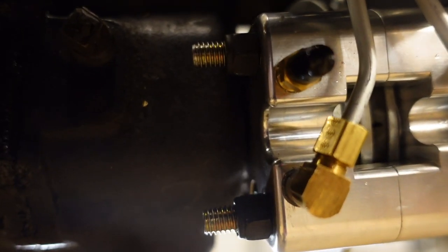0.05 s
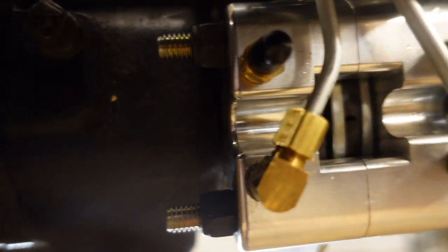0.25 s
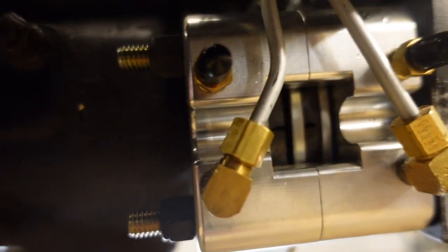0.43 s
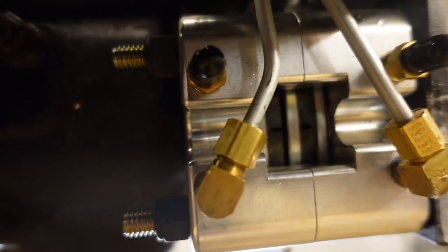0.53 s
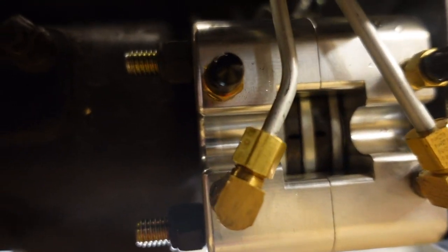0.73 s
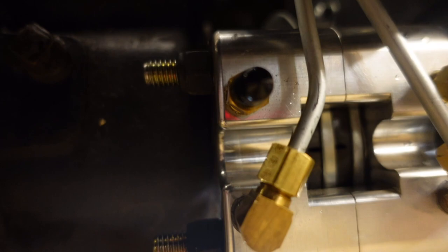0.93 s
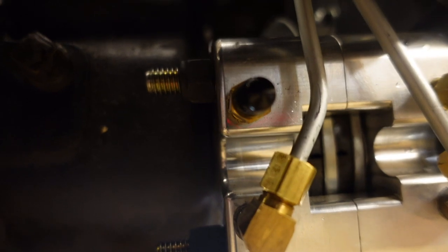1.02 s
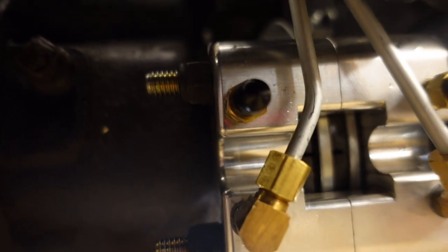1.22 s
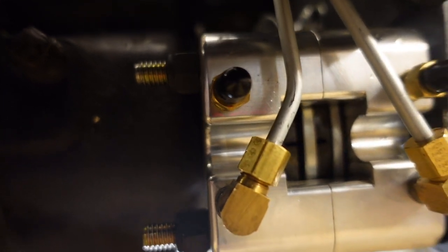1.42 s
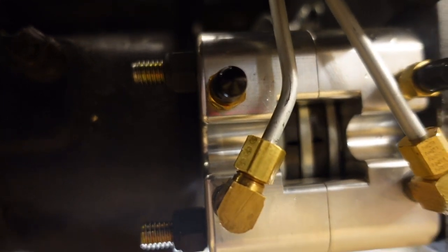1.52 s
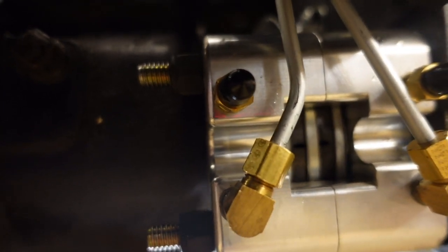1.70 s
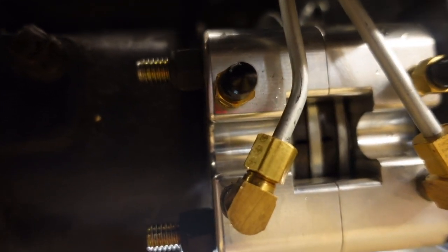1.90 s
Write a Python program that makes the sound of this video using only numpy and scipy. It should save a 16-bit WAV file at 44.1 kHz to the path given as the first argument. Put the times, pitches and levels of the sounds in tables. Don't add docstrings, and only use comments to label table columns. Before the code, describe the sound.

Close metallic clicks of a hydraulic brake caliper, worked twice. Each time small ticks lead to a hard clack on the disc, a bright snap and a looser double clack, over quiet workshop air noise.

```python
import sys
import numpy as np
from scipy import signal
from scipy.fft import rfft, irfft, next_fast_len
from scipy.io import wavfile
from scipy.ndimage import map_coordinates

SR = 44100
rng = np.random.default_rng(int(sys.argv[2]) if len(sys.argv) > 2 else 0)


def boost(x):
    u = np.asarray(x, float) / 20
    return 10 ** u


def to_wav(sig):
    pcm = np.clip(np.atleast_2d(sig), -1, 1) * 32767
    pcm = np.round(pcm).astype(np.int16)
    wavfile.write(sys.argv[1], SR, pcm.T)


N = 85995

# [t/s, level/dB]
SLIDE_LEVEL = [(0, -51.5), (.04, -57.5), (.083, -60.5), (0.088, -54.5), (.22, -50), (.285, -52.5),
               (.83, -54), (.87, -53), (.96, -57.5), (1.03, -61.5), (1.09, -59.5), (1.098, -51.5),
               (1.192, -54), (1.224, -48), (1.95, -61)]
# [f/Hz, level/dB per Hz]
SLIDE_COLOUR = [(150, -50), (300, -35), (480, -10), (1000, -2), (1750, -4), (2400, -11), (7480, -21.5),
                (15500, -58)]
# [f/Hz, level/dB per Hz]
AIR_COLOUR = [(25, -34.5), (200, -23), (370, -4.5), (850, -3), (1300, -5.5), (3000, -24.5), (7500, -27),
              (15500, -52)]
AIR_DB = -56.5
# [f/Hz, level/dB]
HUM_TONES = [(385, -69), (845, -69)]
# [t/s, level/dB]
HISSES = [
    (0.65, -42),
    (.64, -38.5),
    (1.501, -39),
    (1.25, -37),
    (0.037, -55),
    (.16, -54),
    (0.79, -52),
]
# [f/Hz, level/dB per Hz]
HISS_COLOUR = [(1500, -7), (3500, -1), (5500, 2), (8000, -7.5), (15500, -40)]
# [t/s, level/dB, f/Hz]
TICKS = [(0.0854, -53.5, 4800), (.0935, -55, 5360), (0.1597, -42.5, 4130), (.177, -41.5, 4250),
         (.1915, -39, 4590), (.22, -42, 4920), (.236, -45, 4850), (1.0955, -46, 4100),
         (1.1153, -45.5, 4300), (1.1225, -41.5, 5240), (1.1645, -51, 5200), (0.4862, -44.5, 4340)]
# [f/Hz, width/Hz, level/dB]
PIVOT_MODES = [(2950, 200, -14), (5600, 400, -8), (7460, 400, -13), (8800, 400, -17), (10300, 500, -19)]
# [f/Hz, level/dB per Hz]
TICK_COLOUR = [(2500, -3.5), (4500, 0), (8000, -8), (15500, -35)]
PIVOT_WIDTH_HZ, PIVOT_DB = 280, 7
# [t/s, length/s, level/dB, from f/Hz, to f/Hz]
SEAL_STROKES = [
    (0.092, .17, -57, 1400, 1897),
    (1.058, 0.18, -53.5, 1401, 1940),
]
SEAL_WIDTH_HZ = 120
# [t/s, level/dB, f/Hz,
# width/Hz]
PINGS = [(.22, -42, 2480, 250), (.3035, -37, 7400, 300), (.487, -46, 5100, 140), (.6405, -38, 5370, 507),
         (.641, -42.5, 7400, 400), (.844, -43, 1940, 120), (.871, -43.5, 1330, 101),
         (1.233, -36.5, 5400, 200), (1.2325, -37, 3170, 200), (1.4137, -39.5, 2660, 120),
         (1.4145, -45, 5370, 140), (1.5523, -40, 6720, 90), (1.6735, -44.5, 3150, 100),
         (1.673, -40, 480, 150), (0.6215, -33, 2600, 300), (1.5488, -29, 2580, 300)]
# [f/Hz, level/dB per Hz]
PING_COLOUR = [(1000, -19), (5000, -26), (15500, -63)]
# [t/s, level/dB, brightness/dB per octave]
KNOCKS = [
    (.224, -41, 6),
    (.485, -37, -5.5),
    (.7422, -42, -6.5),
    (.844, -59, -11),
    (.871, -57, -10),
    (.9253, -65, 14),
    (1.4137, -40, -3),
    (1.436, -41, -3.5),
    (1.6726, -42, -2),
    (1.684, -41, -5),
]
# [f/Hz, width/Hz, level/dB]
LINKAGE_MODES = [(440, 110, -5), (530, 130, -2), (973, 100, 2), (1300, 130, -3), (2620, 120, -6),
                 (3250, 120, -8), (5340, 200, -11)]
# [f/Hz, level/dB per Hz]
KNOCK_COLOUR = [(150, -21.5), (450, 2.5), (1200, -11.5), (4500, -0.5), (12000, -38)]
# [t/s, level/dB, brightness/dB per octave]
CLAMPS = [(.2925, -31.5, -3.5), (.2955, -27.5, -1), (.299, -24, -1), (.3025, -26.5, 2), (.305, -25, 0),
          (.308, -25, 1.5), (.311, -38, -5.5), (.3175, -40.5, -14.5), (.323, -35.5, -6.5),
          (1.2248, -30.5, -4.5), (1.2285, -27.5, -4), (1.2322, -20.5, 2.5), (1.2345, -24.5, 1.5),
          (1.2375, -28, -6.5), (1.241, -28.5, -3.5), (1.247, -31, -2.5), (1.252, -31, -4.5)]
# [f/Hz, width/Hz, level/dB]
FIRST_GRIP_MODES = [(1028, 43, 3.5), (1402, 26, 9), (1670, 25, -4), (1993, 11, 3), (2720, 19, -16),
                    (3380, 46, -10), (4080, 100, -13), (4250, 54, -8), (5140, 48, -8.5), (6470, 50, -17),
                    (7500, 190, -15.5), (12700, 83, -33.5)]
# [f/Hz, width/Hz, level/dB]
SECOND_GRIP_MODES = [(534, 49, -6.5), (986, 19, 4), (1196, 140, -0.5), (1790, 74, -3), (2204, 63, -1.5),
                     (2720, 28, -2), (3170, 21, -16), (3900, 26, -14), (4840, 30, -9.5), (5240, 68, -7.5),
                     (6640, 79, -12.5), (12200, 140, -40)]
# [f/Hz, level/dB per Hz]
CLAMP_COLOUR = [(120, -68), (200, -15), (974, 2.5), (2750, 5), (5300, 3.5), (5910, -6.5), (15500, -40.5)]
CLAMP_LOSS = .035
# [t/s, level/dB]
RINGS = [
    (.312, -39.5),
    (1.25, -41.5),
]
# [f/Hz, width/Hz, level/dB]
RING_MODES = [(989, 30, -1), (1195, 55, -11)]
# [t/s, level/dB, brightness/dB per octave]
SNAPS = [
    (.5643, -21.5, 0),
    (.5662, -30, 0),
    (.5715, -35, 0),
    (.584, -45, 2),
    (1.4983, -21, 0),
    (1.4998, -29, 0),
    (1.5045, -37, 0),
    (1.516, -43, 2),
]
CLIP_MODES = [(4950, 210, 5), (5600, 500, -8), (7730, 400, -9)]
# [f/Hz, level/dB per Hz]
SNAP_COLOUR = [(1200, -24), (2200, -5), (4300, 0), (6500, -10), (8300, -18), (9200, -40), (15500, -62)]
# [pan/dB, near echo/dB, far echo/dB]
SNAP_SENDS = (.1, -19, -19)
# [t/s, level/dB]
SHIVERS = [
    (.5765, -40.5),
    (.582, -35),
    (.596, -38.5),
    (.626, -29.5),
    (1.505, -36.5),
    (1.515, -38.5),
    (1.554, -26.5),
]
# [t/s, level/dB, brightness/dB per octave]
CLACKS = [
    (.6212, -25, -2),
    (.625, -25.5, 4),
    (.6285, -29.5, -5),
    (.633, -29.5, -7.5),
    (.6495, -45, 1),
    (1.5486, -26, -5),
    (1.5523, -25, 5),
    (1.5565, -36.5, -3),
    (1.577, -52, -3),
]
# [f/Hz, width/Hz, level/dB]
PAD_MODES = [(1258, 50, 1), (1615, 110, -2), (1830, 130, 0), (2140, 160, 0), (2680, 300, 4),
             (3800, 500, -5), (4700, 600, -9)]
# [f/Hz, level/dB per Hz]
CLACK_COLOUR = [(200, -24), (1150, -8), (2600, -3), (5000, -13), (8000, -36), (15500, -72)]
# [t/s, level/dB]
THUMPS = [
    (.63, -49.5),
    (.7422, -52.5),
    (.93, -63.5),
    (1.235, -56.5),
    (1.555, -47),
    (1.675, -48.5),
]
# [f/Hz, width/Hz, level/dB]
FRAME_MODES = [(134, 35, -6), (165, 40, -2), (380, 90, 0)]
# [f/Hz, level/dB per Hz]
THUMP_COLOUR = [(120, 2.5), (600, -35.5)]
# [t/s, level/dB]
SQUEALS = [
    (1.7, -48.5),
    (1.735, -51.5),
]
# [f/Hz, width/Hz, level/dB]
DISC_MODES = [(2340, 18, 2), (3780, 15, 0.5), (4700, 73, -14.5), (5000, 55, -9), (6620, 49, -7),
              (8800, 35, -22)]
# [f/Hz, fade/s]
BENCH_FADE = [(300, 0.36), (8000, 0.081)]
# [f/Hz, fade/s]
SHOP_FADE = [(200, 1), (1500, 0.38), (5000, 0.81), (12000, 0.67)]
# [f/Hz, likeness from 0 to 1]
ALIKE = [(60, 1), (240, 0.99), (950, 0.9), (3770, 0.7), (15000, 0.62)]
# [f/Hz, level/dB]
LEFTWARD = [(60, -1), (380, 0.5), (2380, -0.5), (15000, -0.5)]
# [f/Hz, level/dB]
MIC = [(30, -27.5), (400, 5), (15000, 1)]
TOP_HZ = 15750


def unit(x):
    return x / np.sqrt(np.mean(x ** 2) + 1e-20)


def along(points, hz):
    f, v = np.transpose(points)
    return np.interp(np.log(hz + 1), np.log(f + 1), v)


def causal(gain):
    c = irfft(np.log(gain + 1e-6))
    c[1:len(c) // 2] *= 2
    c[len(c) // 2 + 1:] = 0
    return np.exp(rfft(c))


def wobble(rate):
    knots = rng.standard_normal(int(N * rate / SR) + 4)
    return map_coordinates(knots, [np.arange(N) * rate / SR])


def contacts(rows, peaks, colour, contact_s, edge_db, damping, rough, side_db):
    size = 8192
    f, t = np.fft.rfftfreq(size, 1 / SR), np.arange(size) / SR
    out = np.zeros((2, N + size))
    broad = causal(boost(along([(colour[0][0] / 4, -80)] + list(colour), f) + edge_db))
    below = 1 + (0.5 * peaks[0][0] / (f + 1)) ** 2
    above = 1 + (f / (1.43 * peaks[-1][0])) ** 2
    skirt = causal(1 / below / above)
    for s, db, *slope in rows:
        chance = rng.standard_normal((len(peaks), 2, 1)) * [[1.5], [5]]
        modes = 0
        for k, (hz, width_hz, mode_db) in enumerate(peaks):
            loss = 1j * f * width_hz * damping
            modes = modes + (-1) ** k * boost(mode_db + chance[k]) * loss / (hz * hz - f * f + loss)
        fade_in = np.tanh(30 * t / contact_s)
        scrape = rng.standard_normal((2, size)) * boost(-60 * t / contact_s) * fade_in
        z = rfft(scrape)
        scrape = irfft(z / np.abs(z) ** .85) * boost(-20 * t / contact_s)
        scrape *= rough / np.linalg.norm(scrape, axis=1, keepdims=True)
        scrape[0, 0] += 1 - np.clip(rough, 0, 1)
        slopes = np.array([[sum(slope)], [sum(slope) + 2.5]])
        tilt = slopes * np.log2(f / 2000 + .3)
        hit = irfft(rfft(scrape) * (modes * skirt + broad) * [causal(boost(v)) for v in tilt])
        start = round(s * SR)
        out[:, start:start + size] += boost([[db], [db + side_db]]) * hit / np.abs(hit[0]).max()
    return out[:, :N]


def spread(pair, spectrum):
    m = next_fast_len(N + 8192)
    hz = np.fft.rfftfreq(m, 1 / SR)
    turn = np.arccos(np.clip(along(ALIKE, hz), -1, 1)) / 2
    mid, side = rfft(pair, m) * boost(along(spectrum, hz)) * [np.cos(turn), np.sin(turn)]
    lean = boost(along(LEFTWARD, hz) / 2)
    return irfft(np.array([(mid + side) * lean, (mid - side) / lean]), m)[:, :N]


def slide():
    s, level_db = np.transpose(SLIDE_LEVEL)
    grain_db = 1.26 * wobble(350) + 1.55 * wobble(42.72)
    grit = rng.standard_normal((2, N)) * boost(grain_db)
    return unit(spread(grit, SLIDE_COLOUR)) * boost(np.interp(np.arange(N) / SR, s, level_db))


def air():
    level = boost(AIR_DB - 3.5 + 2.0 * wobble(7.0))
    return level * unit(spread(rng.standard_normal((2, N)), AIR_COLOUR))


def hum():
    t = np.arange(N) / SR
    return sum(boost(db + 2.9 * wobble(12.1)) * np.sin(2 * np.pi * hz * t + wobble(15)) for hz, db in HUM_TONES)


def hiss():
    return contacts(HISSES, [(5000, 2000, -20)], HISS_COLOUR, .14,
                    edge_db=0, damping=1, rough=1, side_db=-8)


def tick():
    out = 0
    for s, db, hz in TICKS:
        modes = sorted(PIVOT_MODES + [(hz, PIVOT_WIDTH_HZ, PIVOT_DB)])
        out = out + contacts([(s, db)], modes, TICK_COLOUR, .013,
                             edge_db=-11.5, damping=1, rough=.65, side_db=-20)
    return out


def seal():
    t, out = np.arange(N) / SR, np.zeros(N)
    for s, length_s, db, from_hz, to_hz in SEAL_STROKES:
        u = np.clip((t - s) / length_s, 0, 1)
        turns = np.cumsum(from_hz + (to_hz - from_hz) * u) / SR
        swell = boost(db) * np.sin(np.pi * u) ** .5
        out += swell * wobble(SEAL_WIDTH_HZ) * np.sin(2 * np.pi * turns)
    return out


def ping():
    return sum(contacts([(s, db)], [(hz, width_hz, 0)], PING_COLOUR, .008,
                        edge_db=0, damping=1, rough=.85, side_db=-14)
               for s, db, hz, width_hz in PINGS)


def knock():
    return contacts(KNOCKS, LINKAGE_MODES, KNOCK_COLOUR, .016,
                    edge_db=-10, damping=1.3, rough=.8, side_db=-14)


def clamp():
    first = [c for c in CLAMPS if c[0] < 1]
    second = [c for c in CLAMPS if c[0] > 1]
    out = 0
    for rows, modes in [(first, FIRST_GRIP_MODES), (second, SECOND_GRIP_MODES)]:
        damped = [(hz, width_hz + CLAMP_LOSS * max(hz - 1200, 0), db) for hz, width_hz, db in modes]
        out = out + contacts(rows, damped, CLAMP_COLOUR, .018,
                             edge_db=-10, damping=1.3, rough=.95, side_db=-13)
    return out


def ring():
    return contacts(RINGS, RING_MODES, CLACK_COLOUR, .3, edge_db=-30, damping=1, rough=1, side_db=-14)


def snap():
    return contacts(SNAPS, CLIP_MODES, SNAP_COLOUR, .005, edge_db=-13, damping=1, rough=.45, side_db=-11)


def shiver():
    return contacts(SHIVERS, PAD_MODES[:1], CLACK_COLOUR, .03,
                    edge_db=-24, damping=1.5, rough=.97, side_db=-18)


def clack():
    return contacts(CLACKS, PAD_MODES, CLACK_COLOUR, .007,
                    edge_db=-9, damping=1.2, rough=.75, side_db=-12)


def thump():
    return contacts(THUMPS, FRAME_MODES, THUMP_COLOUR, .25,
                    edge_db=-12, damping=1.1, rough=.97, side_db=-20)


def squeal():
    return contacts(SQUEALS, DISC_MODES, HISS_COLOUR, .3,
                    edge_db=-22, damping=1.8, rough=1, side_db=-12)


def echo(x, fade):
    out, step = np.zeros((2, N + 2 * SR)), SR // 6
    for i in range(0, N, step):
        hz, t, z = signal.stft(rng.standard_normal((2, SR)), SR, nperseg=128)
        faded = z * boost(-60 * t / along(fade, hz)[:, None])
        tail = signal.istft(faded, SR, nperseg=128)[1][:, :SR]
        wet = signal.fftconvolve(x[None, i:i + step], tail / np.linalg.norm(tail[0]), axes=1)
        out[:, i + 130:i + 130 + wet.shape[1]] += wet
    return spread(out[:, :N], [(3000, 0.27), (14000, 5.8)])


def scene():
    parts = [(tick() + hiss(), .1, -9, -9),
             (ping() + squeal(), .3, -18, -20),
             (knock() + thump(), .6, -6, -7),
             (clamp() + ring(), .8, -6, -7),
             (snap(), *SNAP_SENDS),
             (clack() + shiver(), .6, -11, -11)]
    direct = sum(np.array([mid + side, mid - side]) * boost([[pan_db], [-pan_db]])
                 for (mid, side), pan_db, _, _ in parts)
    near = echo(sum(x[0] * boost(near_db) for x, _, near_db, _ in parts), BENCH_FADE)
    far = echo(sum(x[0] * boost(far_db) for x, _, _, far_db in parts), SHOP_FADE)
    m = next_fast_len(N + 8192) // 2 * 2
    mic = causal(boost(along(MIC, np.fft.rfftfreq(m, 1 / SR))))
    heard = irfft(rfft(direct + near + far, m) * mic, m)[:, :N]
    return heard + slide() + air() + seal() + hum()


def top_cut(x):
    return signal.sosfilt(signal.butter(12, 15700, fs=SR, output="sos"), x)


def record(dry):
    z = rfft(dry) * (np.fft.rfftfreq(N, 1 / SR) < TOP_HZ)
    mix = irfft(z, N)
    return top_cut(mix)


dry = scene()
out = record(dry)
to_wav(out)
```